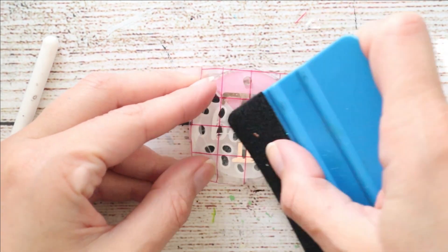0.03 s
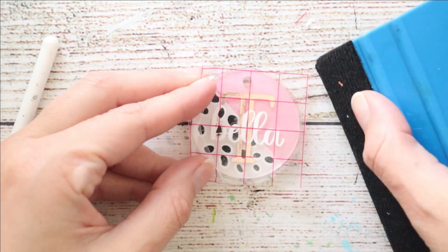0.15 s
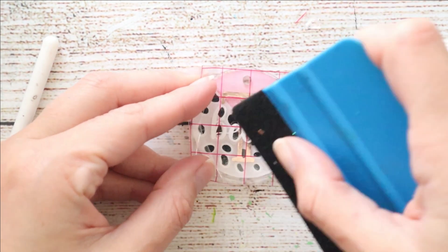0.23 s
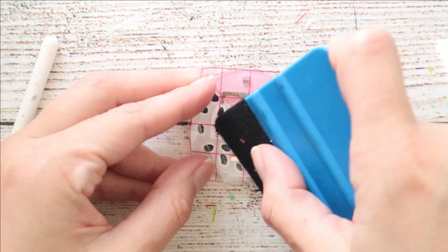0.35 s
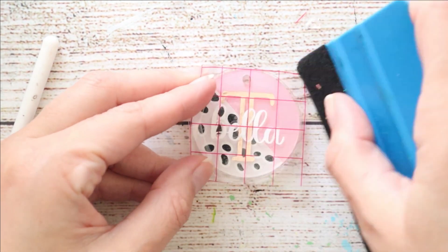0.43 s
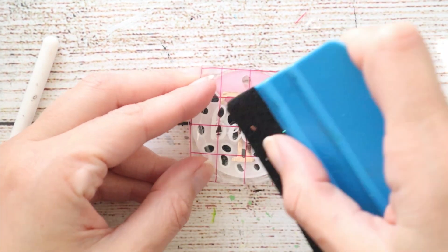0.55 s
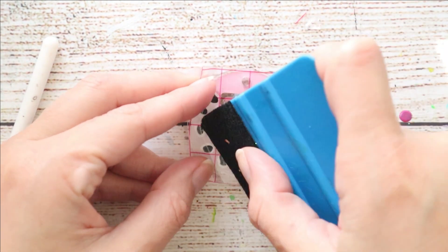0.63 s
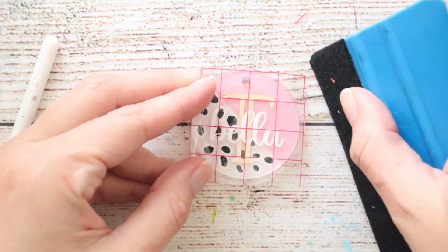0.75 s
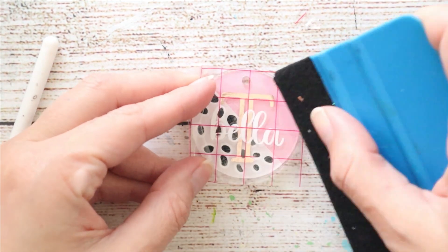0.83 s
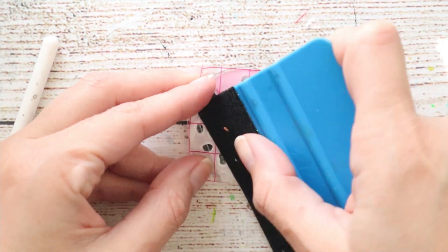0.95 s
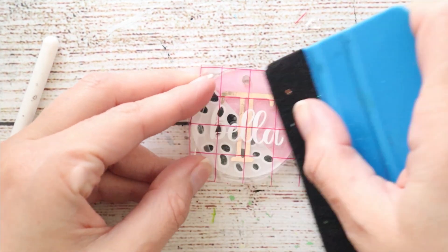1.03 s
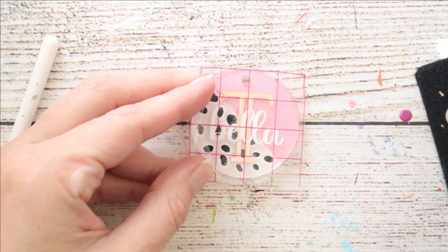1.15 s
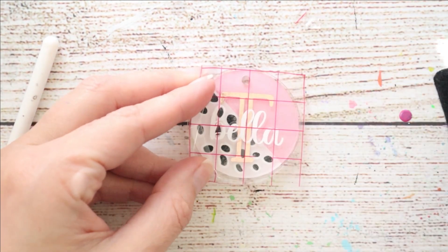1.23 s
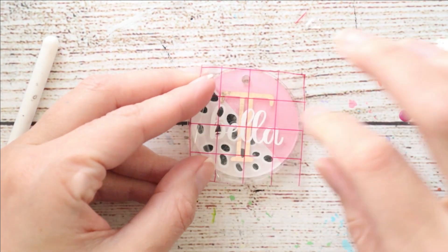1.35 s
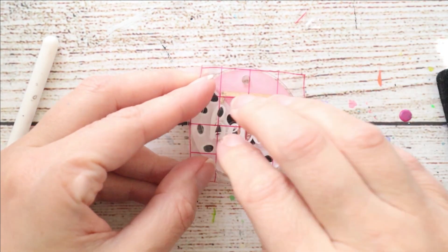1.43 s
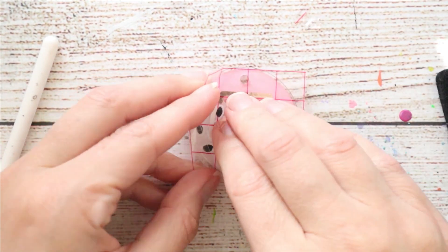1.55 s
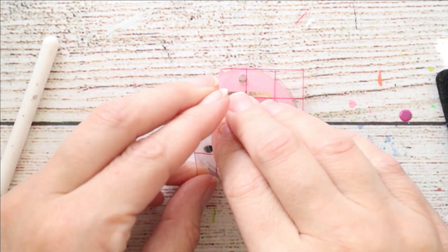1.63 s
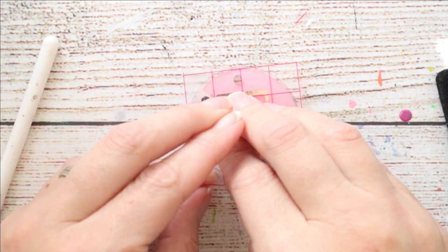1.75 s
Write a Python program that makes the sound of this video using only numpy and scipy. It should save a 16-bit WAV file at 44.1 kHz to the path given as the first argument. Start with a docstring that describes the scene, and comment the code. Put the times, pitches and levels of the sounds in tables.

```python
"""A squeegee is swept three times over transfer tape on an acrylic disc lying on a wooden table.
Each stroke starts with a sharp clack of the squeegee on the disc (rattling noise and ringing modes), scrapes
the tape (gritty noise) and drops off the rim with a thump (low modes and noise bursts). After one more clack,
fingers knock the disc and pick at the tape, which ticks and rustles (short noise bursts).
All is heard through a close stereo microphone in a small room (fading noise echo) with a quiet background.
"""
import sys
import numpy as np
from scipy import signal
from scipy.fft import rfft, irfft
from scipy.io import wavfile
from scipy.ndimage import map_coordinates

SR = 44100
rng = np.random.default_rng(int(sys.argv[2]) if len(sys.argv) > 2 else 0)


def put_to_file(sound):
    """Save the sound as 16-bit audio at rate SR, in the file named by the first command-line argument."""
    columns = np.atleast_2d(sound).T  # one column per channel
    safe = np.clip(columns, -1, 1)
    whole_steps = np.round(safe * 32767)
    wavfile.write(sys.argv[1], SR, whole_steps.astype(np.int16))


N = 79380
HIT_T = np.arange(SR // 2) / SR  # half a second of time for each single sound

# Corner frequencies of the clack colours: f/Hz
CLACK_COLOUR_HZ = [600, 1100, 1800, 2800, 4200, 6000, 8500, 11200, 15000]
# Squeegee hits the acrylic disc, a sharp clack: t/s, table level/dB, rattle length/s, rattle decay/s,
# ping f/Hz, ping level/dB, then level/dB at each of CLACK_COLOUR_HZ
CLACK_EVENTS = [ (0.4183, 0, 0.0033, .007, 1590, -18.5, 1, -2.5, -1.5, -13.5, -20, -15.5, -34, -36.5, -59.5),
                (0.7095, -1.5, 0.0031, 0.00099, 637, -2, -1, -1, 5.5, 0.5, -1.5, -1.5, -12, 7, -20.5),
                (1.0274, -5, 0.005, 0.0044, 1660, -13.5, -6, -10.5, -3.5, -13, -11.5, -13, -26, -12, -38),
                (1.4074, 1, 0.0023, 0.003, 2612, -1, -2.5, 5, -6, 5.5, -3.5, -26.5, -10, -30, -24)]
# Ringing of the acrylic disc: f/Hz, t60/s (time to fall 60 dB), relative level/dB
DISC_MODES = [(930, 0.012, -36.5), (1375, .035, -28.5), (1603, 0.053, -38.5), (2015, 0.027, -9),
              (2730, 0.032, -42.5), (2760, 0.017, -12.5), (5900, 0.0069, -42.5)]
# Higher, woody ringing of the table after a hard contact: f/Hz, t60/s, relative level/dB
WOOD_MODES = [(564.7, 0.088, -21), (608, 0.15, -28), (667, 0.039, -21.5), (728, 0.057, -24)]
# Low ringing of the table: f/Hz, t60/s, level/dB struck beside the disc, level/dB struck through the disc
TABLE_MODES = [ (56.4, 0.24, -27.5, -31.5), (78, 0.078, -15, -19), (116.6, 0.061, -15, -25),
               (138.6, 0.14, -23, -24.5), (188.1, 0.33, -28.5, -40), (225.5, 0.053, -39.5, -54.5),
               (246, 0.11, -14, -18), (265.5, 0.035, -29, -51), (309, 0.065, -16, -8),
               (377.3, 0.18, -35, -29)]
DISC_DB, CLACK_WOOD_DB, THUMP_WOOD_DB = 1.5, -1, -5.5
RATTLE_LOW_HZ = 520  # the rattle is thinned below this
TREBLE_SPLIT_HZ, TREBLE_DECAY_S = 3000, 0.0028
PING_RISE_S, PING_LAG_S = 0.00084, 0.0004

# Corner frequencies of the rubbing colours: f/Hz
RUB_COLOUR_HZ = [300, 1600, 3000, 6000, 11000]
# Sliding contact on the tape: start t/s, length/s, rise/s, level change over the length/dB,
# then level/dB at each of RUB_COLOUR_HZ
RUB_EVENTS = [ (0, 0.036, 0.0016, 9, -58, -45.5, -51.5, -51, -62),
              (0.036, 0.096, .01, -6.5, -30.5, -43, -39, -42.5, -48),
              (.135, 0.11, 0.0027, 5.5, -26.5, -50.5, -47.5, -53.5, -48.5),
              (.425, 0.12, 0.0025, -21, -12.5, -12, -25, -63, -55),
              (0.454, .068, .03, -1, -42, -27.5, -37, -37.5, -41.5),
              (0.534, 0.011, 0.0021, 0.5, -1, -25.5, -32, -35, -32),
              (.72, 0.16, .005, -1, -32, -30, -40, -59, -43.5),
              (1.036, 0.14, 0.0026, -16.5, -34, -16.5, -26.5, -45.5, -35),
              (1.151, 0.22, 0.0018, -29.5, -21.5, -25.5, -27.5, -32.5, -33.5),
              (1.45, 0.17, 0.014, -10, -19.5, -25, -48, -43, -63),
              (1.706, 0.0074, 0.0077, -2.5, -50, -22, -21, -21, -34.5),
              (1.65, .12, 0.0057, -3.5, -38, -44, -46.5, -48.5, -43.5)]
RUB_GRAINS_PER_S, RUB_GRAIN_DB, RUB_RELEASE_S = 2500, 3, 0.0096
RUB_SMOOTH = 1  # smooth hiss compared with the grains
RUB_WAVER_DB, RUB_WAVER_S = 1.45, 0.0075  # unsteady hand pressure: typical size and step time
RUB_LOW_HZ, TAPE_TOP_HZ = 170, 12600  # rubbing is thinned below, tape noise above

# Squeegee or finger landing on the table: t/s, thud level/dB, knock level/dB, snap level/dB
THUMP_EVENTS = [ (0.0371, -16, -34.5, -36), (0.068, -19.5, -46, -23), (.0785, -18.5, -42, -38),
                (0.2287, -10, -17, -12.5), (0.5284, 1, -1, -6), (0.8321, -4, 0.5, -12),
                (1.147, -1, 1, -5.5), (1.3106, -20, -20, -39.5)]
# Colour of a woody knock: f/Hz, level/dB
KNOCK_COLOUR = [(200, -4.5), (600, 0), (1100, -3), (2100, -4.5), (3200, -17.5), (6000, -33.5),
                (14000, -43.5)]
# Colour of a tape snap: f/Hz, level/dB
SNAP_COLOUR = [(800, -29.5), (3000, -13), (5000, -8), (8000, -8.5), (10800, -0.5), (13000, -15.5),
               (16000, -56)]
# Late bass echoes of a thud in the room: delay t/s, level/dB
BOOM_ECHOES = [(.044, -24.5), (.064, -21)]
BOOM_TOP_HZ = 257
KNOCK_DECAY_S, SNAP_DECAY_S, SNAP_LAG_S, ATTACK_S = 0.0035, 0.002, 0.00069, 0.00032
THUD_PUSH_S, PRESS_PUSH_S = 0.0013, 0.0011  # a push is strongest after a quarter of this

# Fingertips pressing the disc: t/s, thud level/dB, knock level/dB
PRESS_EVENTS = [(1.4665, -18, -12.5), (1.4773, -5, -4.5), (1.500, -16.5, -37), (1.5128, -15, -27),
                (1.5243, -12, -15.5), (1.548, -15.5, -31), (1.5700, -14.5, -13), (1.582, -21.5, -20)]
# Ticks of tape and light touches: t/s, level/dB, centre f/Hz, width/octaves, decay/s
TICK_EVENTS = [ (0.036, -35, 4000, 0.84, 0.00078), (0.063, -27.5, 3240, .8, .0015),
               (0.0676, -24.5, 3470, 0.73, 0.0027), (.1380, -14.5, 10000, 0.74, 0.0017),
               (0.2003, -28.5, 1600, 0.78, 0.0024), (.2432, -32, 9100, 1.3, 0.001),
               (0.4153, -24, 1060, .7, .002), (.7077, -22.5, 1170, 0.91, 0.0013),
               (1.0252, -8.5, 998, 0.47, 0.001), (1.031, -14.5, 9500, 0.76, 0.0049),
               (1.4248, -23, 7400, 0.86, 0.0046), (1.5608, -22, 5630, 0.38, 0.002),
               (1.5697, -18.5, 7000, 0.54, 0.00059), (1.6490, -17, 6300, 0.94, 0.0015),
               (1.7535, -39, 3400, 0.8, 0.0057)]

# Echo of the small room: f/Hz, t60/s, level/dB
ROOM_BANDS = [(60, 0.29, -1), (250, 0.66, -15.5), (700, 0.28, -8), (2160, 0.58, -12.5), (5000, 0.41, -13.5),
              (11000, 0.37, -17.5), (15000, .15, -20.5)]
CLACK_ROOM_DB, RUB_ROOM_DB = -4, 1  # how much the clacks and the rubbing stir the room
ROOM_FADE_IN_S = 0.0094
# Colour of the quiet background: f/Hz, level/dB
FLOOR_COLOUR = [(20, -40), (55, -23), (130, -35.5), (280, -31.5), (500, -43), (1200, -45), (2000, -48),
                (4000, -57.5), (8000, -65.5), (12000, -64), (13300, -95.5), (16000, -115)]
# How alike left and right are: f/Hz, correlation (1 alike, 0 unrelated, below 0 opposed)
LEFT_RIGHT_LIKENESS = [(130, .99), (280, 0.87), (590, 0.53), (1270, 0.061), (2700, -0.14), (6000, -0.23),
                       (11000, -0.32)]
RIGHT_LAG_S = 0.0001
DIP_HZ, DIP_WIDTH_HZ, DIP_DB = 449, 32, -7.5  # narrow dip in the tone of all handling sounds and their echo
LOW_CUT_HZ, EDGE_HZ, OVERLOAD = 91, 16000, 0.93  # microphone bass cut, top limit, clipping level


def clacks():
    """The squeegee hits the disc: rattling noise, ringing of disc and table, and one short ping."""
    out = np.zeros((2, N))
    thud = table(PRESS_PUSH_S, True)
    modes = amp(DISC_DB) * ring(DISC_MODES) + amp(CLACK_WOOD_DB) * ring(WOOD_MODES, flip=True)
    low_pass = signal.butter(2, TREBLE_SPLIT_HZ, fs=SR, output="sos")
    for s, table_db, hold, decay, ping_hz, ping_db, *tone_db in CLACK_EVENTS:
        rattle = colour(burst(decay, hold), lambda hz: hz ** 2 / (hz ** 2 + RATTLE_LOW_HZ ** 2))
        # After the hold, the treble gets an extra fade
        dull = signal.sosfiltfilt(low_pass, rattle)
        treble_fade = np.exp(-np.maximum(HIT_T - hold, 0) / TREBLE_DECAY_S)
        rattle = dull + (rattle - dull) * treble_fade
        clack = shaped(rattle + modes, list(zip(CLACK_COLOUR_HZ, tone_db)))
        add(out, s, clack + amp(table_db) * thud)
        # The ping swells for PING_RISE_S, then dies away
        ping = ring([(ping_hz, np.log(1000) * PING_RISE_S, ping_db)])
        add(out, s + PING_LAG_S, np.e * HIT_T / PING_RISE_S * ping)
    return out


def rubs():
    """Felt or skin slides on the tape: dense stick-slip grains over a smooth hiss, under wavering pressure."""
    out, t = np.zeros((2, N)), HIT_T
    for s, length, rise, fade_db, *tone_db in RUB_EVENTS:
        # Grains come at random moments with random strengths
        is_slip = rng.random(len(t)) < RUB_GRAINS_PER_S / SR
        slips = is_slip * amp(RUB_GRAIN_DB * np.minimum(rng.exponential(1, len(t)), 4))
        strength = np.hypot(slips / slips.std(), RUB_SMOOTH) / np.hypot(1, RUB_SMOOTH)
        grit = spread(rng.standard_normal((2, len(t))) * strength)
        waver = map_coordinates(rng.standard_normal(size=256), [t / RUB_WAVER_S], order=1)
        pressure = amp(fade_db * np.minimum(t / length, 1) + RUB_WAVER_DB * waver)
        release = np.exp(-np.maximum(t - length, 0) / RUB_RELEASE_S)
        envelope = np.minimum(t / rise, 1) * pressure * release

        def tone(hz):
            bass_cut = hz ** 2 / (hz ** 2 + RUB_LOW_HZ ** 2)
            return amp(read(zip(RUB_COLOUR_HZ, tone_db), hz)) * tape_top(hz) * bass_cut

        add(out, s, colour(grit * envelope, tone))
    return out


def thumps():
    """A landing on the table: deep thud with its echoes, woody knock and the snap of the tape."""
    out = np.zeros((2, N))
    thud = table(THUD_PUSH_S, False)
    wood = amp(THUMP_WOOD_DB) * ring(WOOD_MODES, flip=True)
    boom = signal.sosfilt(signal.butter(2, BOOM_TOP_HZ, fs=SR, output="sos"), thud)
    for s, thud_db, knock_db, snap_db in THUMP_EVENTS:
        knock = wood + shaped(burst(KNOCK_DECAY_S), KNOCK_COLOUR)
        add(out, s, amp(thud_db) * thud + amp(knock_db) * knock)
        snap = shaped(burst(SNAP_DECAY_S), SNAP_COLOUR)
        add(out, s + SNAP_LAG_S, amp(snap_db) * snap)
        for delay, echo_db in BOOM_ECHOES:
            add(out, s + delay, amp(thud_db + echo_db) * boom)
    return out


def presses():
    """Fingertips rock the disc: each small dull knock is a soft table thud plus a noise burst."""
    out = np.zeros((2, N))
    thud = table(PRESS_PUSH_S, True)
    for s, thud_db, knock_db in PRESS_EVENTS:
        knock = shaped(burst(KNOCK_DECAY_S), KNOCK_COLOUR)
        add(out, s, amp(thud_db) * thud + amp(knock_db) * knock)
    return out


def ticks():
    """Single crinkles and touches: short noise bursts, each in its own band."""
    out = np.zeros((2, N))
    for s, db, centre_hz, octaves, decay in TICK_EVENTS:
        def band(hz):
            distance = np.log2((hz + 1) / centre_hz) / octaves
            return np.exp(-0.5 * distance ** 2) * tape_top(hz)

        width_gain = np.sqrt(SR / 2 / (centre_hz * octaves))  # makes up for what a narrow band loses
        add(out, s, amp(db) * width_gain * colour(burst(decay), band))
    return out


def table(push_s, through_disc):
    """The table top's answer to one soft blow: its low modes, blurred by the length of the push."""
    modes = [(hz, t60, under if through_disc else beside) for hz, t60, beside, under in TABLE_MODES]
    push = HIT_T * np.exp(-4 * HIT_T / push_s)
    return -signal.fftconvolve(ring(modes), push[None] / push.sum(), axes=1)[:, :len(HIT_T)]


def ring(modes, flip=False):
    """Decaying modes, a little later on the right; flip makes neighbours swing in opposition."""
    t = np.maximum(HIT_T - np.array([[0], [RIGHT_LAG_S]]), 0)
    total = 0
    for k, (hz, t60, db) in enumerate(modes):
        decay = np.exp(-np.log(1000) * t / t60)
        total = total + (-1) ** (k * flip) * amp(db) * decay * np.sin(2 * np.pi * hz * t)
    return total


def burst(decay, hold=0):
    """A brief flurry of tiny contacts: noise that rises fast, holds and dies away."""
    envelope = np.minimum(HIT_T / ATTACK_S, 1) * np.exp(-np.maximum(HIT_T - hold, 0) / decay)
    return spread(rng.standard_normal((2, len(HIT_T)))) * envelope


def tape_top(hz):
    """The tape's noise falls off steeply in the top treble."""
    return 1 / np.sqrt(1 + (hz / TAPE_TOP_HZ) ** 44)


def amp(db):
    """Decibels to gain."""
    return 10 ** (np.asarray(db) / 20)


def read(points, hz):
    """A curve's value between its points, on a log-frequency axis."""
    f, value = np.transpose(list(points))
    return np.interp(np.log(hz + 1), np.log(f + 1), value)


def add(mix, s, sound):
    """Mixes a stereo sound in at time s, cut off at the end of the mix."""
    part = mix[:, round(s * SR):][:, :sound.shape[1]]
    part += sound[:, :part.shape[1]]


def colour(x, gain):
    """Filter whose gain is a function of frequency, with no sound ahead of the input (minimum phase)."""
    size = 4096
    log_gain = np.log(np.maximum(gain(abs(np.fft.fftfreq(size, 1 / SR))), 1e-5))
    taps = np.fft.ifft(np.exp(np.conj(signal.hilbert(log_gain)))).real[:size // 2]
    return signal.fftconvolve(x, taps[None], axes=1)[:, :x.shape[1]]


def shaped(x, points):
    """Colours a sound by (Hz, dB) points."""
    return colour(x, lambda hz: amp(read(points, hz)))


def spread(pair):
    """Makes two unrelated channels alike in the bass, as two close microphones hear them."""
    a, b = rfft(pair)
    same = np.clip(read(LEFT_RIGHT_LIKENESS, np.fft.rfftfreq(pair.shape[1], 1 / SR)), -1, 1)
    mid = a * np.sqrt((1 + same) / 2)
    side = b * np.sqrt((1 - same) / 2)
    return irfft(np.array([mid + side, mid - side]), pair.shape[1])


def room(x):
    """A small room's diffuse tail, each band dying at its own speed, fed by the left channel."""
    hz, t, bands = signal.stft(spread(rng.standard_normal((2, SR))), SR, nperseg=256)
    t60 = read([(f, seconds) for f, seconds, _ in ROOM_BANDS], hz)[:, None]
    db = read([(f, level) for f, _, level in ROOM_BANDS], hz)[:, None]
    even_energy = np.sqrt(2 * np.log(1000) / (t60 * SR))  # evens out long and short tails
    bands = bands * amp(db) * np.exp(-np.log(1000) * t / t60) * even_energy
    tail = signal.istft(bands, SR, nperseg=256)[1][:, :SR]
    tail = tail * np.minimum(np.arange(SR) / SR / ROOM_FADE_IN_S, 1)
    return signal.fftconvolve(x[:1], tail, axes=1)[:, :N]


def floor():
    """Quiet room tone: steady coloured noise."""
    noise = spread(rng.standard_normal((2, N)))
    return irfft(rfft(noise) * amp(read(FLOOR_COLOUR, np.fft.rfftfreq(N, 1 / SR))), N)


def scene():
    """All the handling sounds in their room, over the room tone."""
    hits = clacks()
    slides = rubs()
    touches = thumps() + presses() + ticks()
    echo = room(amp(CLACK_ROOM_DB) * hits + amp(RUB_ROOM_DB) * slides + touches)

    def narrow_dip(hz):
        return amp(DIP_DB * np.exp(-0.5 * ((hz - DIP_HZ) / DIP_WIDTH_HZ) ** 2))

    return colour(hits + slides + touches + echo, narrow_dip) + floor()


def record(dry):
    """The microphone thins the deepest bass, peaks above OVERLOAD are cut flat; then the band limit."""
    thinned = signal.sosfilt(signal.butter(2, LOW_CUT_HZ, "highpass", fs=SR, output="sos"), dry)
    clipped = np.clip(thinned, -OVERLOAD, OVERLOAD)
    band_limit = signal.firwin(255, EDGE_HZ, window=("kaiser", 8), fs=SR)
    return signal.oaconvolve(clipped, band_limit[None], "same")


dry = scene()
out = record(dry)
put_to_file(out)
```